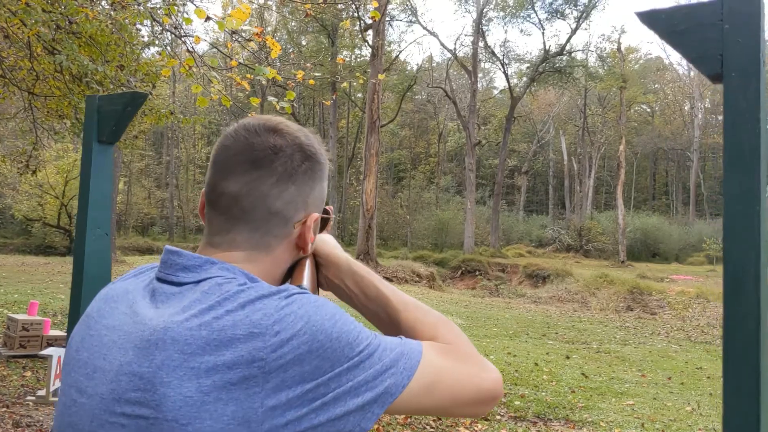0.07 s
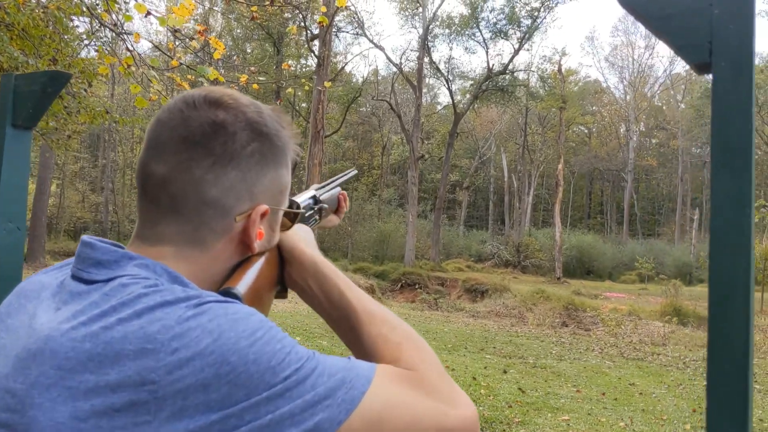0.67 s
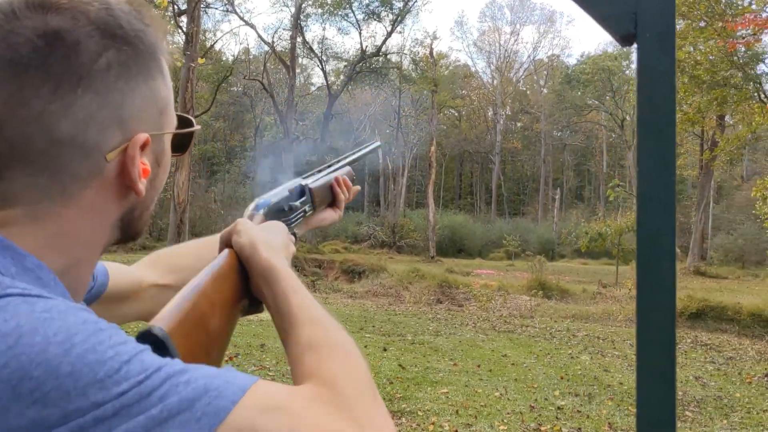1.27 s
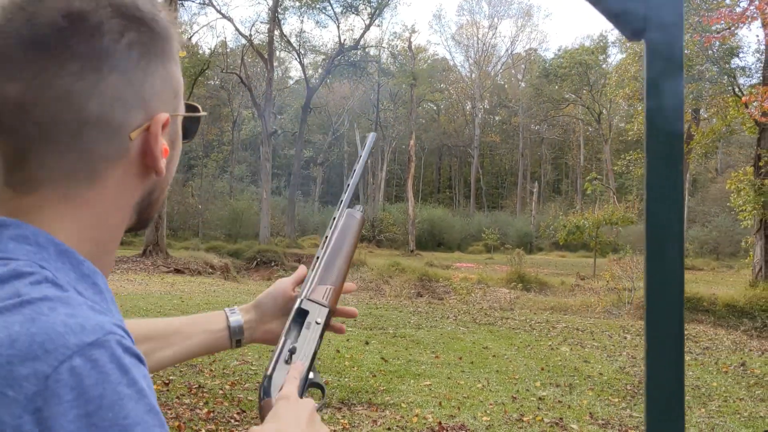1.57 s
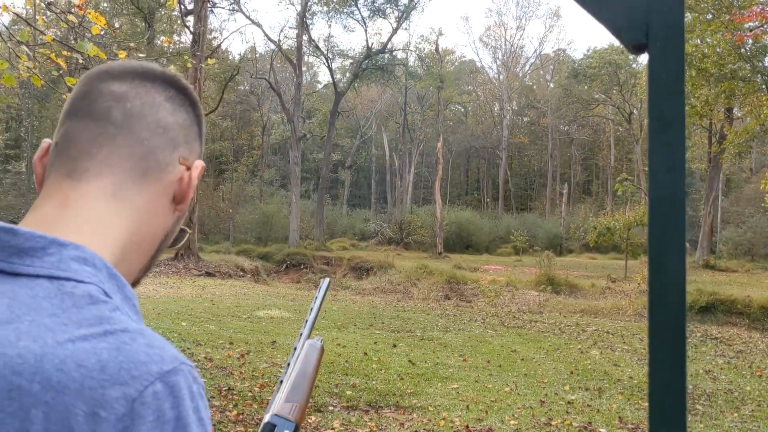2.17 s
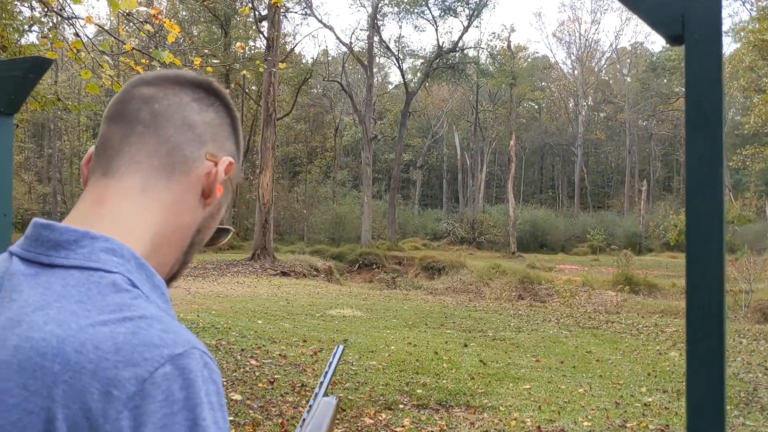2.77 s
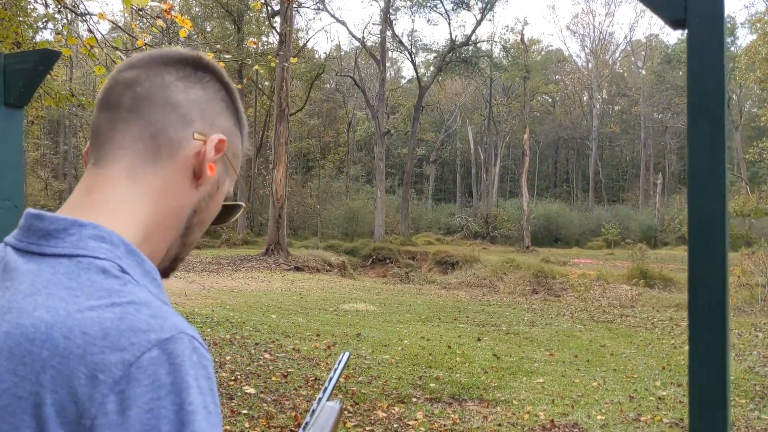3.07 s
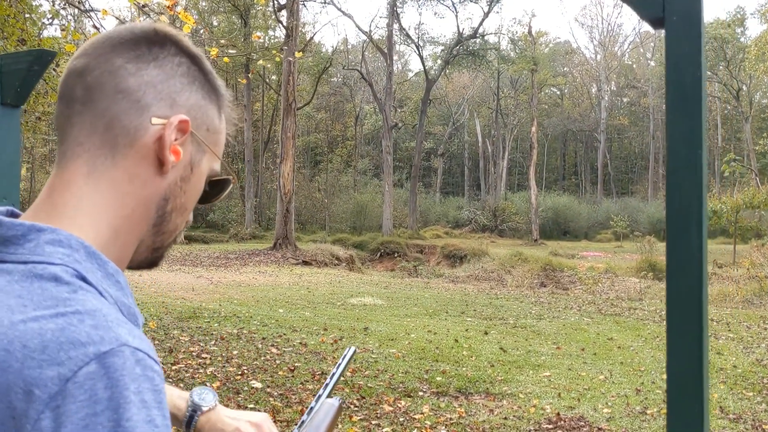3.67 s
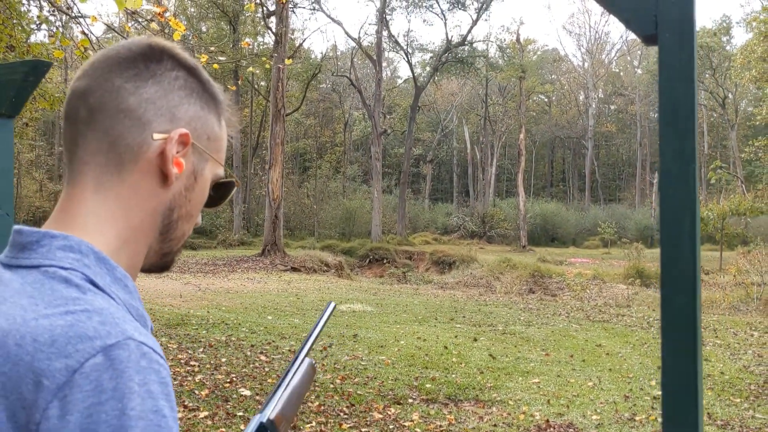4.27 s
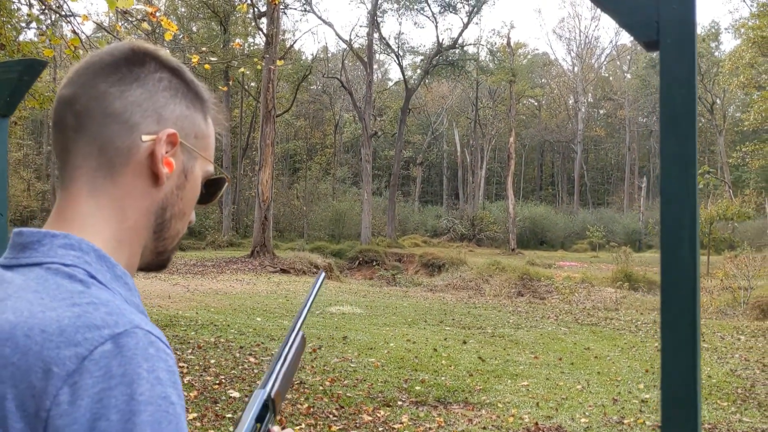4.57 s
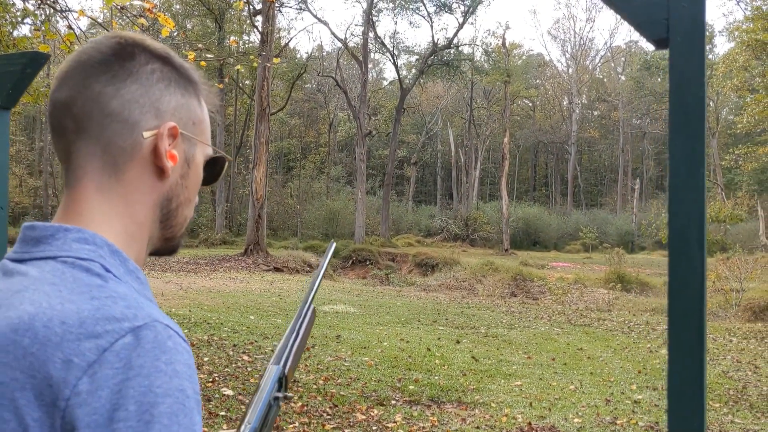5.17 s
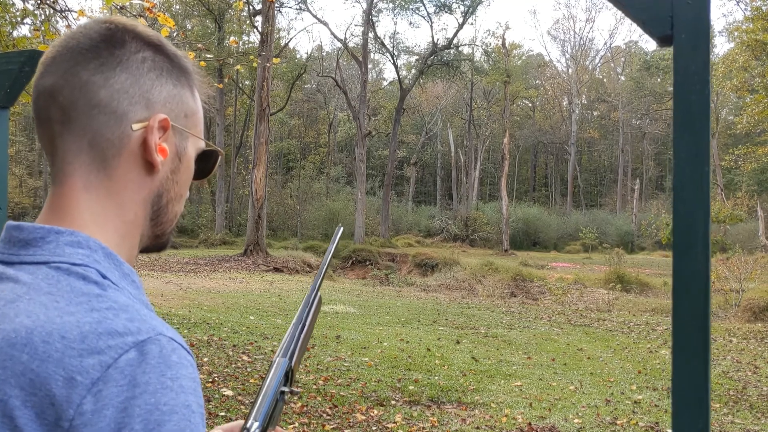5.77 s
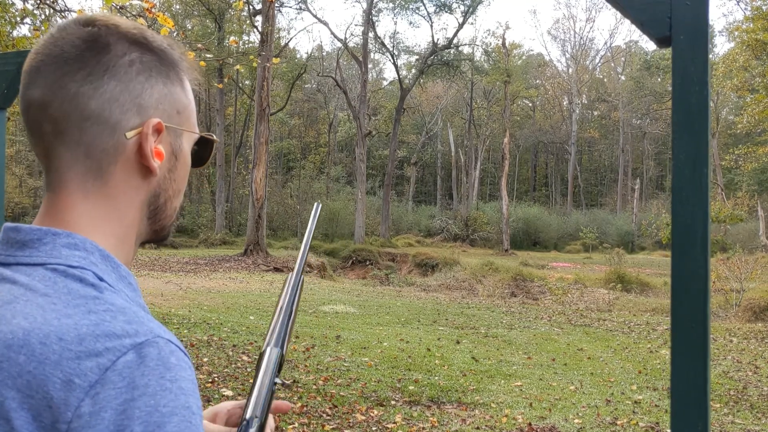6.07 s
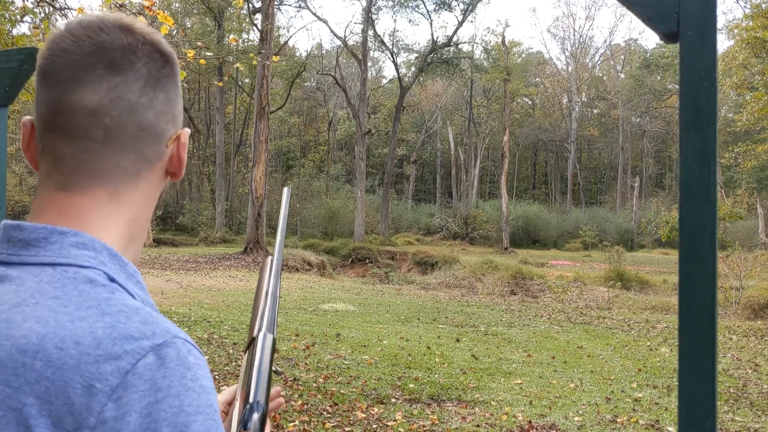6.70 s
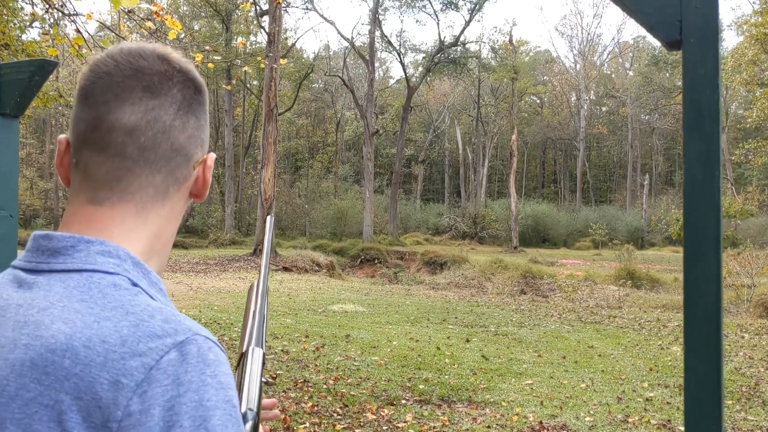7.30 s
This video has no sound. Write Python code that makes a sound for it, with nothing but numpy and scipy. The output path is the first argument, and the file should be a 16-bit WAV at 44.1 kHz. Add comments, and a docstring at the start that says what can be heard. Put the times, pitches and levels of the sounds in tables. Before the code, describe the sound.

Faint thin high tones ring, then a shotgun fires once close by, a loud crack and low thump that echoes back from the woods. As the report fades, the gun is handled and reloaded with small steel clicks and a dull knock on wood. A faint shot rolls in from far away, the bolt slams shut, and a few more clicks follow over light wind in an open field.

```python
"""Shotgun at the edge of a field

Thin high tones ring, then a self-loading shotgun fires once from a stand: a crack, a low thump, and the
report rolling back from the woods. The gun is handled and reloaded: steel clicks, a knock on wood, the
bolt slamming shut. Another shot rolls in from far away, over light wind and a faint hiss.
The whole mix ducks under the blast and creeps back up."""
import sys
import numpy as np
from scipy import signal
from scipy.fft import rfft, irfft, next_fast_len
from scipy.io import wavfile
from scipy.ndimage import uniform_filter1d

SR = 44100
rng = np.random.default_rng(int(sys.argv[2]) if len(sys.argv) > 2 else 0)


def inscribe(sig):
    """Save sig as 16-bit PCM at rate SR to the path in sys.argv[1].

    A 1-D sig is mono; a 2-D sig holds one channel per row.
    Samples are clipped to [-1, 1] before scaling.
    """
    pcm = np.round(np.clip(np.atleast_2d(sig).T, -1, 1) * 32767)
    wavfile.write(sys.argv[1], SR, pcm.astype(np.int16))


N = 323694
CUTOFF_HZ = 16100

# stereo width of the gun, the woods and the open air: freq_hz, side_db
GUN_WIDTH = [(60, 7), (110, 6), (200, -11), (380, -5.5), (700, -14.5), (1290, -6), (2380, 2), (4400, -1),
             (8120, -0.5), (15000, -1.5)]
WOODS_WIDTH = [(60, -20.5), (110, -7.5), (200, -7.5), (380, -9.5), (700, -12.5), (1290, -1.5), (2380, -2.5),
               (4400, 0), (8120, -0.5), (15000, -2)]
AIR_WIDTH = [(60, -11.5), (110, -4), (200, -1.5), (380, -2.5), (700, -11), (1290, 1.5), (2380, -3),
             (4400, 0), (8120, 0), (15000, -0.5)]
# deep rumble of the wind and the far boom: freq_hz, level_db
RUMBLE_COLOUR = [(20, -25), (35, -1.5), (52, 1.5), (75, 3.5), (110, -10.5), (200, -20), (500, -48.5)]


def blast():
    """The crack at the muzzle, then its thinner scatter from the grass and the nearest leaves."""
    # first crack and main burst; grass and leaves: start_s, level_db, attack_s, hold_s, t60_s
    cracks = [(.9095, -11.5, 0.0024, .0005, .032), (.9165, 7, 0.008, 0.0022, .082)]
    scatter = [(.935, -13, 0.049, 0.018, 0.9), (1.05, -15, 0.024, 0.013, 0.31)]
    # their spectra: freq_hz, level_db
    colour = [(88, -33.5), (150, 3), (275, -3), (637, -10), (905, -5.5), (1720, -10.5), (1940, -4.5),
              (2140, -13), (2500, -8.5), (3350, -15.5), (3620, -12.5), (7180, -12.5), (7920, -17),
              (9260, -11.5), (16000, -23)]
    scatter_colour = [(100, -14.5), (300, -1), (700, -2.5), (1700, -1), (2600, -4), (4000, -4), (7000, -7),
                      (11000, -7.5), (13000, -17.5), (16000, -21)]
    # stereo width of the crack: freq_hz, side_db
    width = [(100, 0), (350, -3.5), (700, -9), (1300, -1.5), (3000, -0.5), (15000, 0.5)]
    return noise(colour, width) * swells(cracks) + noise(scatter_colour, GUN_WIDTH) * swells(scatter)


def thumps(rise_s=0.00063):
    """The blast and the bolt leave short low swings, opposite in the two channels."""
    # jolts: start_s, pitch_hz, t60_s, left_db, right_db
    jolts = [(0.9233, 208, 0.052, 11, 15), (0.9248, 80, 0.11, 16, 9), (0.937, 133, 0.17, 8.5, -3.5),
             (5.0106, 66.4, 0.12, -34, -7.5), (5.023, 90, 0.078, -16, -12)]
    out = np.zeros((2, N))
    for start, hz, t60, left_db, right_db in jolts:
        t = np.clip(np.arange(N) / SR - start, 0, 1)
        swing = np.sin(2 * np.pi * hz * t) * strike(t, rise_s, t60)
        out += np.outer([from_db(left_db), -from_db(right_db)], swing)
    return out


def woods():
    """The report rolls back from the edge, the depth and the far side of the woods."""
    # the three returns: start_s, level_db, attack_s, hold_s, t60_s
    returns = [(1.065, -12.5, 0.034, .04, 0.65), (1.12, -16.5, 0.16, 0.16, 4.7),
               (1.48, -18.5, 0.19, 0.032, 1.9)]
    # their spectrum: freq_hz, level_db
    colour = [(29, -42), (50, -18), (141, -11.5), (495, -6), (822, -4.5), (1050, -8), (1270, -14),
              (1740, -10), (2210, -14.5), (2680, -11.5), (3100, -20), (9410, -26), (12000, -36.5),
              (14900, -56), (16000, -58)]
    # extra decay: freq_hz, loss_db_per_s
    loss = [(70, 9), (130, 4.5), (210, 11), (340, 5), (550, 0), (900, 5), (1450, 6), (2400, 14.5),
            (3800, 18), (6200, 28), (10000, 32), (13000, 31.5)]
    return roll(returns, colour, loss, colour_at_s=1.047, lumpy_db=1.5, lumps_per_s=260)


def slap_echoes(t60_s=0.049, repeat_s=0.0114, repeat_db=-5):
    """Single stands of trees throw back sharp echoes; each comes again, weaker, from trunks behind."""
    # echoes: start_s, level_db
    slaps = [(1.081, -4), (1.110, 2.5), (1.221, -1.5), (1.279, -1), (1.337, -2.5), (1.395, -6.5),
             (1.443, -10.5), (1.481, -5)]
    # their spectrum: freq_hz, level_db
    colour = [(80, -22), (200, -1), (500, -1.5), (850, 4), (1300, -13), (2200, -12.5), (4000, -26.5),
              (8000, -35), (14000, -90)]
    hits = [(start, level_db, t60_s) for start, level_db in slaps]
    hits += [(start + repeat_s, level_db + repeat_db, t60_s) for start, level_db in slaps]
    return noise(colour, WOODS_WIDTH) * bursts(hits, rise_s=0.001)


def roll(returns, colour, loss, colour_at_s, lumpy_db, lumps_per_s):
    """Countless trunks return a shot; long paths lose more treble, big returns make the mids lumpy."""
    source, out = noise(colour, WOODS_WIDTH), 0
    age_s = np.clip(np.arange(N) / SR - colour_at_s, -.3, 3)
    lumps_db = lumpy_db * flutter(lumps_per_s)
    lumps_db -= uniform_filter1d(lumps_db, size=SR // 25)   # the overall level stays on its course
    for edge_hz in [*np.geomspace(100, 12800, num=11), CUTOFF_HZ]:
        band = signal.sosfiltfilt(signal.butter(3, edge_hz, fs=SR, output="sos"), source)
        source = source - band
        centre_hz = edge_hz / 2 ** (1 / 3)
        band_lumps_db = lumps_db / (1 + (centre_hz / 2500) ** 2)
        out = out + band * from_db(band_lumps_db - at_hz(loss, centre_hz) * age_s)
    return out * swells(returns)


def bolt(t60_s=0.047, rattle_per_s=135, rattle_db=-16.5):
    """The bolt slams shut in four blows, rattling unevenly all along its run."""
    # it is released, lifts a shell, seats it and locks: start_s, level_db
    blows = [(4.935, -16), (4.9576, -17), (4.995, -11), (5.009, -11)]
    # their spectrum: freq_hz, level_db
    colour = [(150, -58), (250, -14.5), (607, -17.5), (698, -10), (761, -16), (1040, -5), (1200, -13.5),
              (1400, -3.5), (1790, -10), (2160, -10.5), (3170, -15.5), (3840, -14.5), (4900, -13.5),
              (11100, -14), (16000, -25)]
    clatter = noise(colour, GUN_WIDTH)
    first_s, last_s = blows[0][0], blows[-1][0]
    rattle = [(first_s + (k + 1 + 0.14 * late) / rattle_per_s, rattle_db + 0.5 * hard)
              for k, (late, hard) in enumerate(rng.standard_normal(size=(20, 2)))]
    hits = [(start, level_db, t60_s) for start, level_db in [*blows, *rattle] if start <= last_s]
    return clatter * bursts(hits, rise_s=0.00055)


def clicks(catch_t60_s=0.066, treble_t60_share=0.64):
    """Small steel parts meet; each contact's treble dies sooner than its body."""
    # single contacts: start_s, body_db, treble_db, t60_s
    singles = [(.236, -38.5, -49, 0.045), (.261, -41.5, -46, 0.22), (.368, -32.5, -51, 0.08),
               (.426, -42.5, -63, 0.12), (1.626, -35, -29.5, 0.073), (2.111, -42, -40.5, 0.032),
               (2.27, -54, -47.5, 0.036), (2.63, -50.5, -51.5, 0.061), (2.974, -37, -62, 0.038),
               (3.072, -47, -45.5, 0.063), (3.734, -49.5, -59.5, 0.068), (3.806, -44, -56, 0.029),
               (3.9, -40.5, -52, 0.062), (3.981, -37.5, -48.5, 0.065), (5.941, -42.5, -45.5, 0.058),
               (6.404, -47.5, -54, 0.16), (6.516, -46.5, -39.5, 0.038), (7.325, -24.5, -26, 0.06)]
    # sprung catches that click three times: start_s, body_db, treble_db, gap_s, step_db
    catches = [(3.809, -34, -32, .0213, 1.5), (6.582, -46.5, -48, 0.023, -1),
               (7.001, -38, -35.5, .0192, -5.5)]
    # spectra of body and treble: freq_hz, level_db
    body_colour = [(200, -17), (700, -8), (1100, -2), (2200, -4.5), (3600, -9.5), (5000, -22), (9000, -33)]
    treble_colour = [(1500, -35), (3200, -13.5), (4500, 6), (8000, 1.5), (11000, 3.5), (15500, -5)]
    triples = [(start + k * gap, body_db + k * step_db, treble_db + k * step_db, catch_t60_s)
               for start, body_db, treble_db, gap, step_db in catches for k in range(3)]
    start, body_db, treble_db, t60 = np.transpose([*singles, *triples])
    body = bursts(zip(start, body_db, t60), rise_s=0.0012)
    treble = bursts(zip(start, treble_db, t60 * treble_t60_share), rise_s=0.0003)
    return noise(body_colour, GUN_WIDTH) * body + noise(treble_colour, GUN_WIDTH) * treble


def knocks():
    """Two dull knocks on wood, a light one and a firm one."""
    # blows: start_s, level_db, t60_s
    blows = [(3.186, -34.5, 0.078), (3.215, -18, 0.046)]
    # the wood's spectrum: freq_hz, level_db
    colour = [(76, -45.5), (130, -35), (204, 1), (438, -23), (564, 8), (687, -35), (958, 6), (1140, -17),
              (1310, 6), (1620, -14), (1790, -9), (4160, -35), (5260, -23), (5690, -36), (14000, -42)]
    return noise(colour, GUN_WIDTH) * bursts(blows, rise_s=0.00079)


def rub():
    """Hands and cloth slide on the gun with a grainy rustle."""
    # strokes: start_s, level_db, attack_s, hold_s, t60_s
    strokes = [(0, -53, .01, 0.044, 1.2), (.24, -40, .022, .003, .17), (.28, -55.5, .02, 0.15, 1.6),
               (.69, -53, .04, 0.0072, 0.66), (3.07, -55, .02, .02, 1.15),
               (6.91, -60.5, 0.024, 0.045, 0.11), (6.97, -50, 0.036, 0.041, 0.078)]
    # their spectrum: freq_hz, level_db
    colour = [(250, -10), (700, -3), (1300, -3), (2500, -2), (4000, -7.5), (6000, -5.5), (11000, -8.5),
              (15500, -23.5)]
    return noise(colour, AIR_WIDTH) * swells(strokes) * from_db(1.3 * flutter(120) - 0.5)


def steel(x, vary_db=1.5):
    """The receiver and barrel ring briefly; each contact favours other modes."""
    # resonances: pitch_hz, bandwidth_hz, level_db
    modes = [(1032, 29, -6.5), (1275, 6.7, -0.5), (1377, 20, -7.5), (1400, 24, 2), (1694, 31, -0.5),
             (2181, 25, -1.5), (2410, 20, 1.5), (2545, 22, -1), (3116, 33, -6), (3910, 250, -4),
             (4267, 30, -6.5), (4530, 90, -3), (5280, 73, -2), (7070, 58, -3), (7600, 110, -3),
             (9840, 450, -6), (10050, 90, -16), (11630, 82, 3)]
    out = x.copy()
    for hz, bandwidth_hz, level_db in modes:
        radius = np.exp(-np.pi * bandwidth_hz / SR)
        feedback = [1, -2 * radius * np.cos(2 * np.pi * hz / SR), radius ** 2]
        drive = x * from_db(level_db + vary_db * flutter(40)) + 1e-18
        out += signal.lfilter(np.array([1, 0, -1]) * (1 - radius ** 2) / 2, feedback, drive)
    return out


def pings():
    """Some contacts leave a steel part ringing, at a phase of its own in each ear."""
    # ringing parts: start_s, pitch_hz, level_db, t60_s
    parts = [(3.806, 1040, -30, .1), (3.832, 4570, -32, .06), (3.832, 8140, -31, .06),
             (6.517, 3950, -44, .05), (7.002, 4000, -33, .04), (7.002, 1680, -38, .05)]
    t, out = np.arange(N) / SR, 0
    for start, hz, level_db, t60 in parts:
        ring = np.sin(2 * np.pi * (hz * t + rng.random((2, 1))))
        out = out + ring * bursts([(start, level_db, t60)], rise_s=0.00023)
    return out


def field_echo(x, wet_db=-18.5):
    """The stand answers a clack at once, the nearest trees a tenth of a second later."""
    # reflections: delay_s, relative_db, attack_s, hold_s, t60_s
    reflections = [(.005, 0, .004, 0.023, 0.84), (.07, -6, .025, 0.013, .42)]
    # their spectrum: freq_hz, level_db
    colour = [(200, -6), (1000, -15), (2500, 3), (4000, -1), (7000, 2), (11000, -3.5), (15000, -1.5)]
    answer = noise(colour, AIR_WIDTH, size=SR) * swells(reflections, size=SR)
    answer /= np.sqrt(np.sum(answer ** 2) / 2)
    return from_db(wet_db) * signal.fftconvolve(x, answer, axes=1)[:, :N]


def tones(rise_db_per_s=450, fade_db_per_s=107.5, waver=0.92, waver_per_s=125, left_lead_db=8.5):
    """Thin whistling rings swell, wander in pitch and fade, wavering differently in each ear."""
    # rings: full_from_s, full_until_s, pitch_hz, level_db, wander_hz
    rings = [(0, .05, 7800, -35.5, 51), (0, 0.107, 8000, -46, 70), (0, .03, 8530, -50.5, 40),
             (0.044, .14, 6730, -56, 25), (0.05, .29, 10710, -41.5, 14), (0.07, .3, 9500, -52.5, 12),
             (0.06, .15, 14700, -59, 20), (0.298, .39, 11540, -40.5, 20), (0.35, 0.453, 5917, -49, 45),
             (0.323, .51, 5950, -47.5, 40), (0.615, 0.729, 1735, -57.5, 23)]
    t, out = np.arange(SR) / SR, np.zeros((2, N))
    for start, end, hz, level_db, wander_hz in rings:
        drop_db = rise_db_per_s * np.maximum(start - t, 0) + fade_db_per_s * np.maximum(t - end, 0)
        turns = np.cumsum(hz + wander_hz * flutter(waver_per_s)[:SR]) / SR
        for channel, side in zip(out, (1, -1)):
            envelope = from_db(level_db - drop_db + side * left_lead_db / 2)
            sway = 1 + waver * (flutter(waver_per_s)[:SR] + 1j * flutter(waver_per_s)[:SR])
            channel[:SR] += envelope * np.real(sway * np.exp(2j * np.pi * turns))
    return out


def far_shot(lag_s=0.00022):
    """A distant shot rolls across the field from the left, reaching the right side later."""
    # first arrival and long roll: start_s, level_db, attack_s, hold_s, t60_s
    returns = [(4.207, -43.5, .006, 0.0074, .35), (4.235, -39, 0.061, 0.4, 5.9)]
    # their spectrum: freq_hz, level_db
    colour = [(35, -32), (60, 4), (88, -8.5), (118, -19), (183, -6), (321, -3), (642, -3), (707, -5.5),
              (1330, -4), (1780, -7), (2430, -2.5), (6000, -28.5), (7800, -71.5), (13200, -120)]
    # extra decay: freq_hz, loss_db_per_s
    loss = [(70, 0), (500, -2.5), (1200, 1.5), (2500, 11.5), (6000, 36)]
    # its short low boom: start_s, level_db, attack_s, hold_s, t60_s
    boom = (4.205, -42.5, .025, .04, .55)
    left, right = roll(returns, colour, loss, colour_at_s=3.76, lumpy_db=2.1, lumps_per_s=70)
    late_right = np.interp(np.arange(N) - lag_s * SR, np.arange(N), right)
    return np.stack([left, late_right]) + noise(RUMBLE_COLOUR, AIR_WIDTH) * swells([boom])


def background(wind_db=-55, air_db=-59.5, hiss_db=-63.5):
    """Light wind rumbles unevenly under steady open air and a fine hiss."""
    # spectra of air and hiss: freq_hz, level_db
    air_colour = [(60, -9.5), (150, 6), (550, 0), (1000, -14), (2000, -22), (5000, -24), (15000, -34.5)]
    hiss_colour = [(1000, -17), (4000, -8.5), (6300, -20.5), (7100, 1.5), (7700, 2), (8500, -6),
                   (10500, -9), (12000, -6), (15500, -7.5)]
    wind = from_db(wind_db + 2.0 * flutter(8.7)) * noise(RUMBLE_COLOUR, AIR_WIDTH)
    air = from_db(air_db) * noise(air_colour, AIR_WIDTH)
    return wind + air + from_db(hiss_db) * noise(hiss_colour, AIR_WIDTH)


def from_db(db):
    """Decibels to gain."""
    return 10 ** (np.asarray(db) / 20)


def at_hz(points, hz):
    """Read a table on a log-frequency axis."""
    freqs, values = np.transpose(points)
    return np.interp(np.log(np.maximum(hz, 1)), np.log(freqs), values)


def shaped(x, colour):
    """Give steady noise a spectrum."""
    size = next_fast_len(x.shape[-1], real=True)
    gain = from_db(at_hz(colour, np.arange(size // 2 + 1) * SR / size))
    return irfft(rfft(x, size) * gain, size)[..., :x.shape[-1]]


def noise(colour, width, size=N):
    """Stereo noise with a spectrum and a width by frequency; its mid has rms 1."""
    mid, side = rng.standard_normal((2, size))
    x = shaped(mid + shaped(side, width) * np.array([[1], [-1]]), colour)
    return x / np.sqrt(np.mean(x.mean(axis=0) ** 2) + 1e-20)


def flutter(per_s):
    """A smooth random wobble with a spread of about 1."""
    knots = rng.standard_normal(N // 20)
    return np.interp(np.arange(N) / SR * per_s, np.arange(len(knots)), knots)


def strike(t, rise_s, t60_s):
    """Envelope of one blow: a fast rise and an exponential decay."""
    return np.exp(-np.log(1000) * t / t60_s) * (1 - np.exp(-t / rise_s))


def bursts(rows, rise_s):
    """Envelope of blows (start_s, level_db, t60_s) whose powers add."""
    power, t = np.zeros(N + SR), np.arange(SR // 2) / SR
    for start, level_db, t60 in rows:
        first = round(start * SR)
        power[first:first + len(t)] += (from_db(level_db) * strike(t, rise_s, t60)) ** 2
    return np.sqrt(power[:N])


def swells(rows, size=N):
    """Envelope of sounds that grow, hold and die away; their powers add."""
    t, power = np.arange(size) / SR, 0
    for start, level_db, attack, hold, t60 in rows:
        rise = np.clip((t - start) / attack, 0, 1)
        fade_db = np.clip(60 * (t - start - attack - hold) / t60, 0, 200)
        power = power + rise * from_db(level_db - fade_db) ** 2
    return np.sqrt(power)


def gain_control(x, threshold_db=-9, range_db=22, recover_db_per_s=5.2, look_ahead_s=.012):
    """The gain drops just ahead of a very loud sound and recovers at a steady rate."""
    power = uniform_filter1d(np.mean(x ** 2, axis=0), size=SR // 200)
    excess_db = np.clip(10 * np.log10(np.maximum(power, 1e-12)) - threshold_db, 0, range_db)
    recovery_db = recover_db_per_s * np.arange(N) / SR
    duck_db = np.maximum.accumulate(excess_db + recovery_db) - recovery_db
    ahead = np.minimum(np.arange(N) + round(look_ahead_s * SR), N - 1)
    return x * from_db(-duck_db[ahead])


def scene():
    """Everything heard beside the shooter."""
    contacts = clicks() + bolt() + rub()
    handling = knocks() + steel(contacts) + pings()
    shots = blast() + thumps() + woods() + slap_echoes() + far_shot()
    return shots + handling + field_echo(handling) + tones() + background()


def record(dry, low_cut_hz=32, ceiling=2.6):
    """The deepest bass is dropped, the gain ducks under the blast, peaks are rounded, the top is cut."""
    low_cut = signal.butter(2, low_cut_hz, "high", fs=SR, output="sos")
    high_cut = signal.ellip(12, .1, 90, CUTOFF_HZ, fs=SR, output="sos")
    ducked = gain_control(signal.sosfilt(low_cut, dry))
    return signal.sosfilt(high_cut, ceiling * np.tanh(ducked / ceiling))


dry = scene()
out = record(dry)
inscribe(out)
```